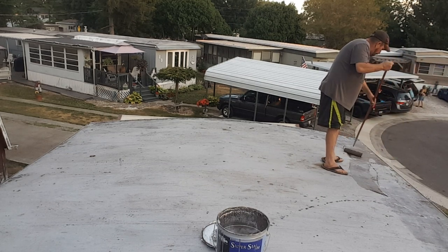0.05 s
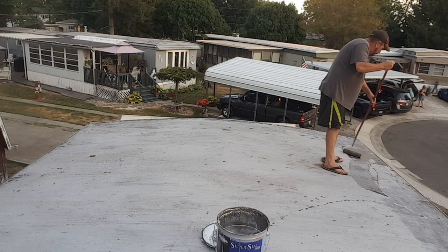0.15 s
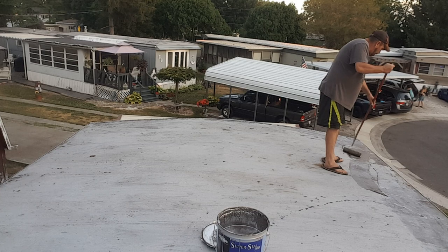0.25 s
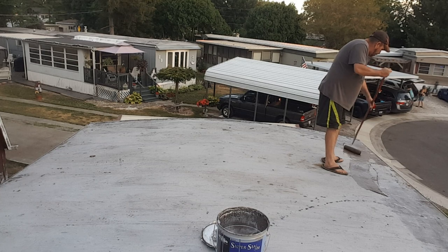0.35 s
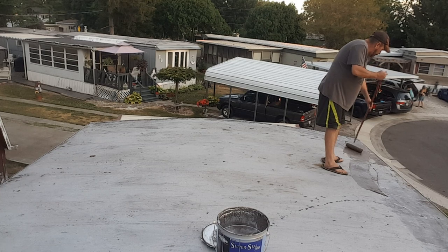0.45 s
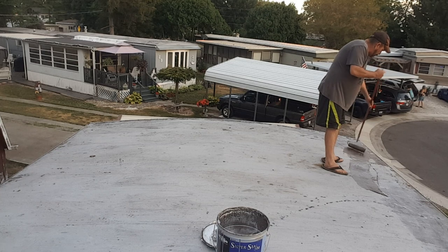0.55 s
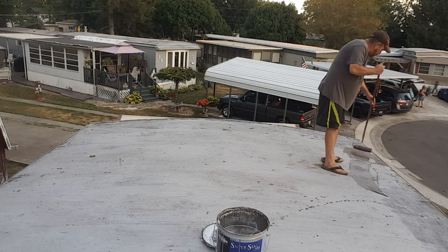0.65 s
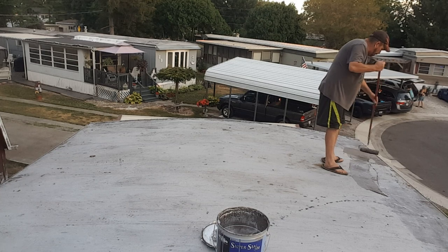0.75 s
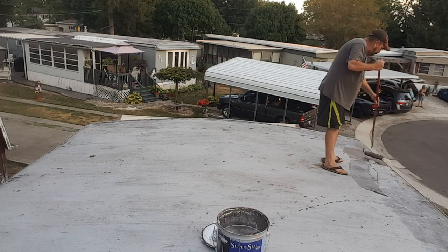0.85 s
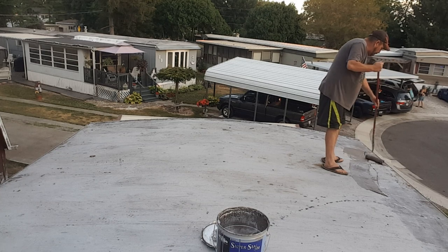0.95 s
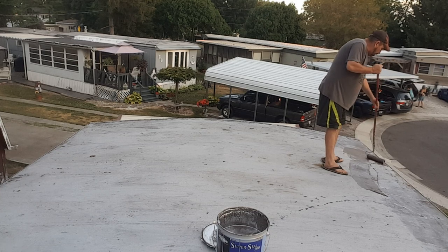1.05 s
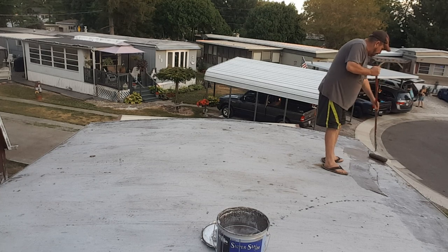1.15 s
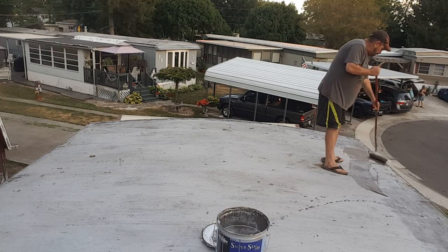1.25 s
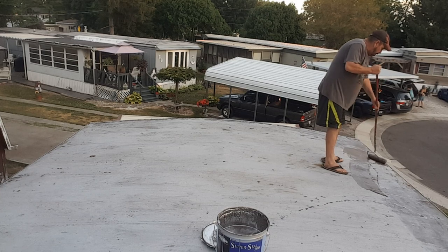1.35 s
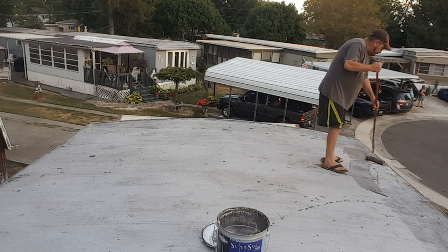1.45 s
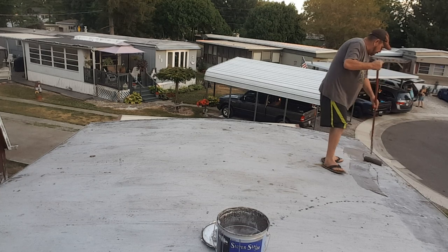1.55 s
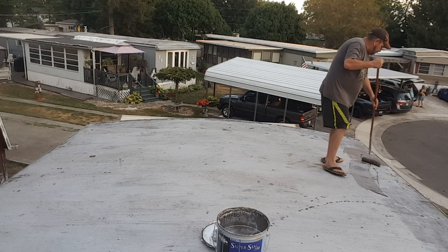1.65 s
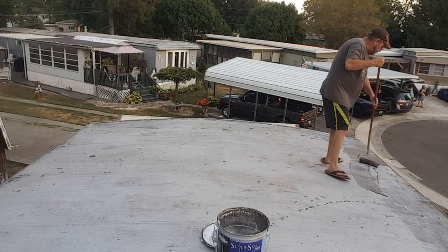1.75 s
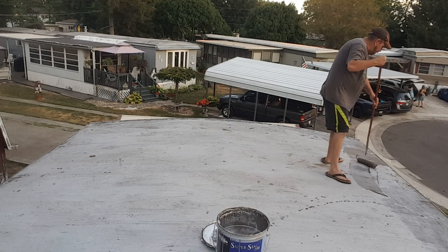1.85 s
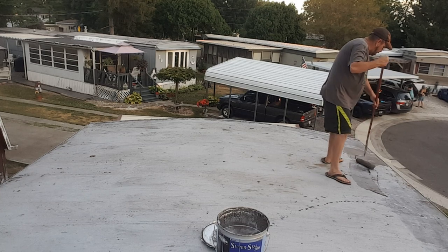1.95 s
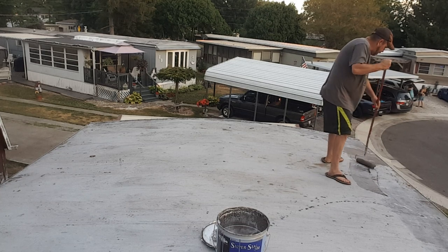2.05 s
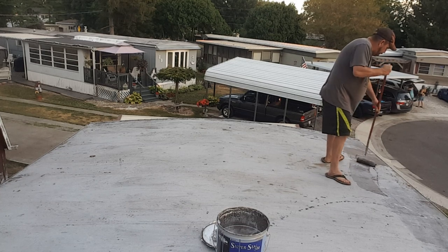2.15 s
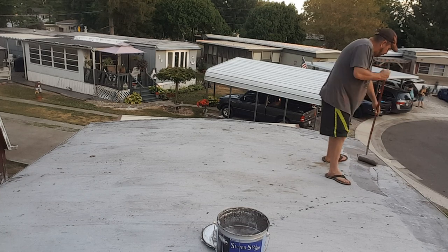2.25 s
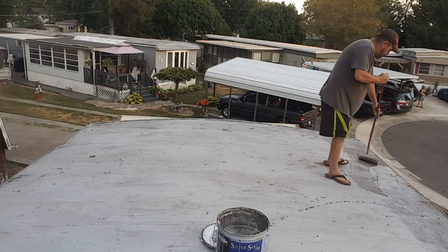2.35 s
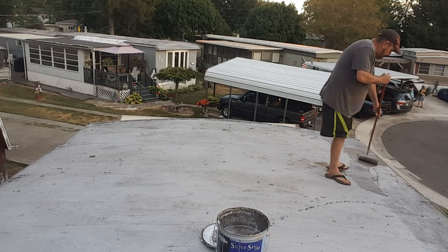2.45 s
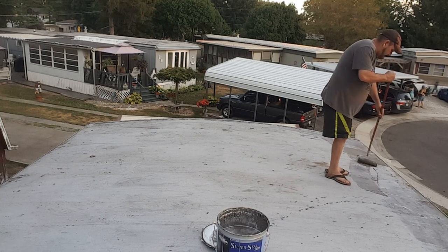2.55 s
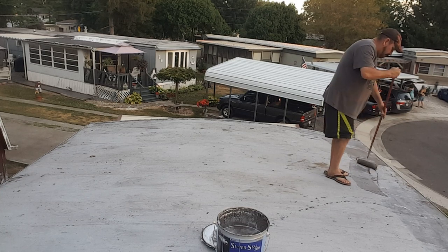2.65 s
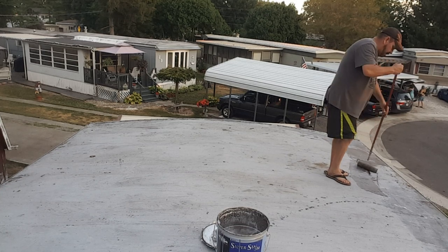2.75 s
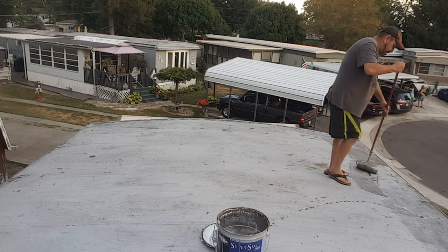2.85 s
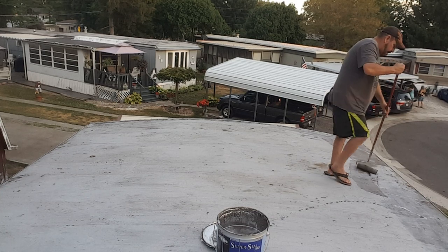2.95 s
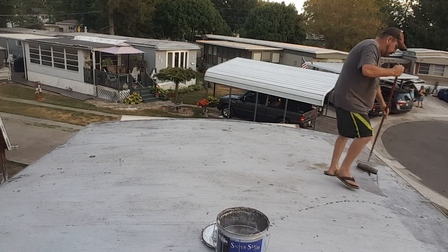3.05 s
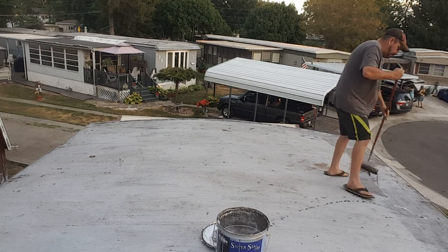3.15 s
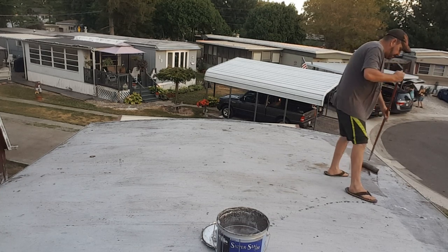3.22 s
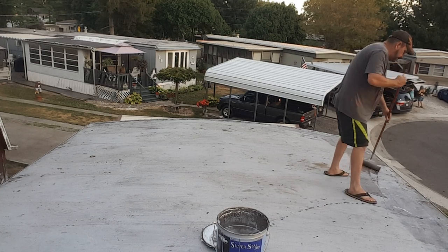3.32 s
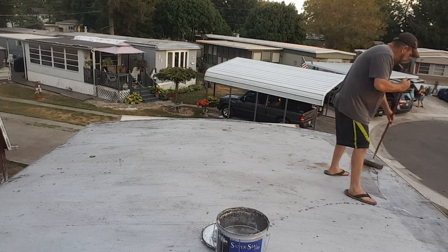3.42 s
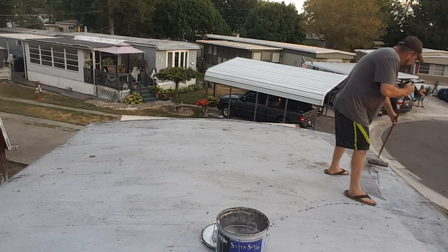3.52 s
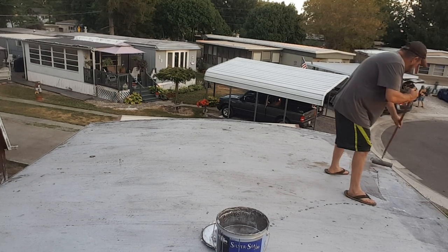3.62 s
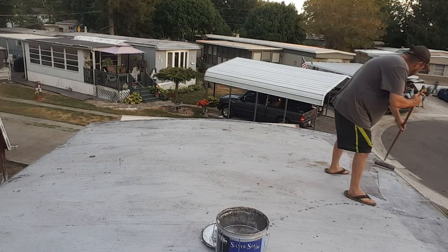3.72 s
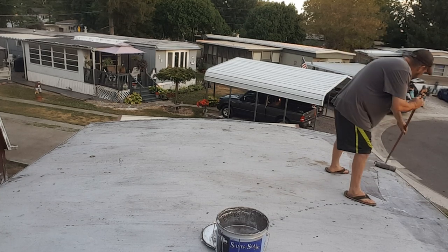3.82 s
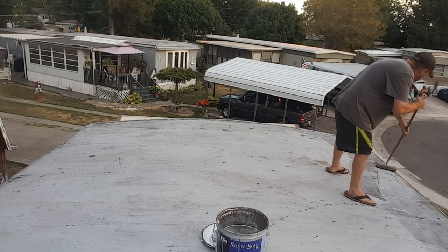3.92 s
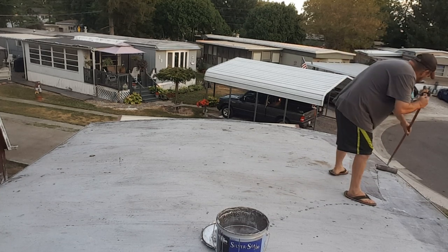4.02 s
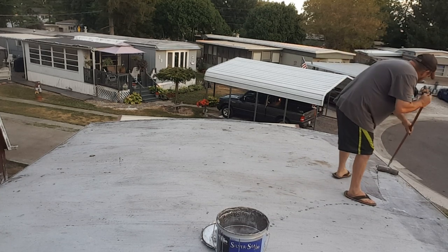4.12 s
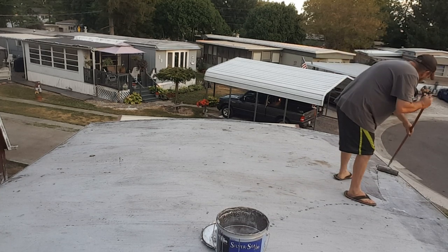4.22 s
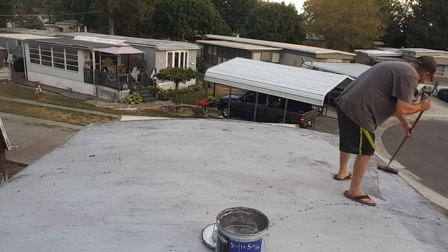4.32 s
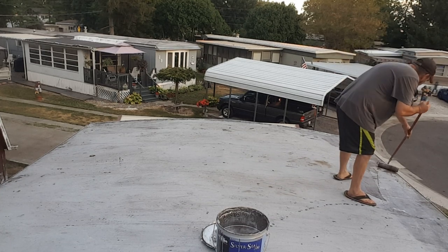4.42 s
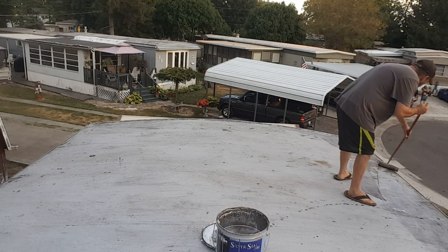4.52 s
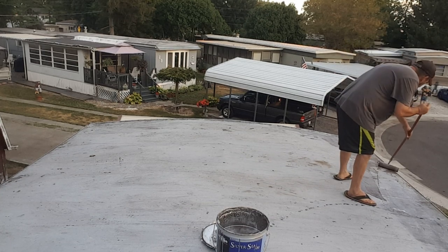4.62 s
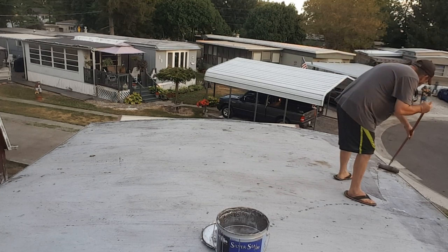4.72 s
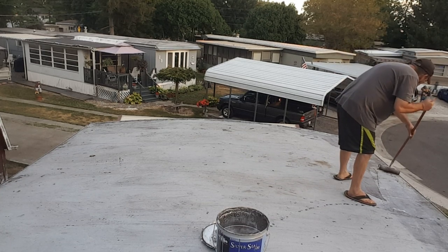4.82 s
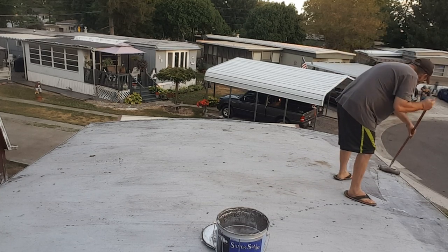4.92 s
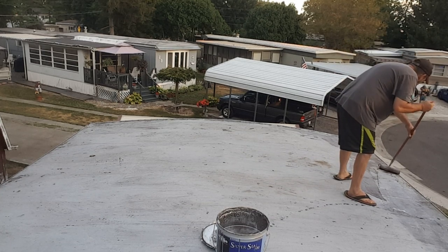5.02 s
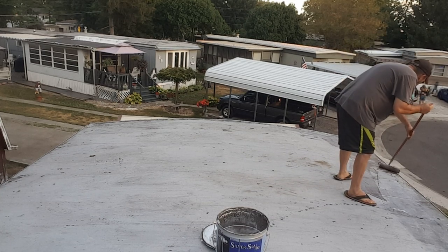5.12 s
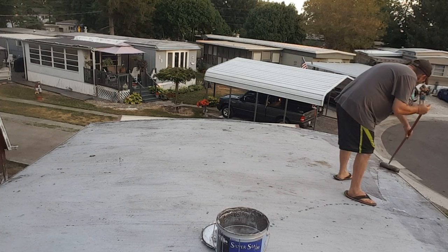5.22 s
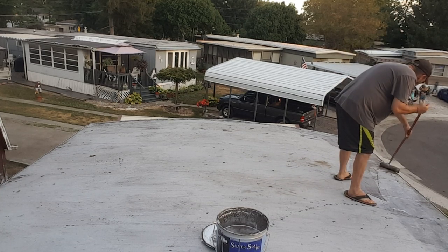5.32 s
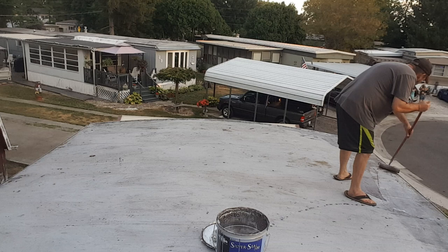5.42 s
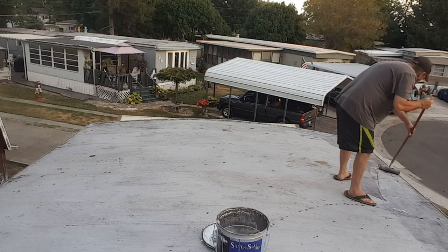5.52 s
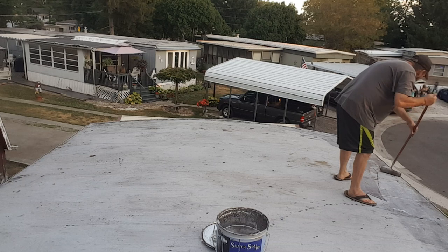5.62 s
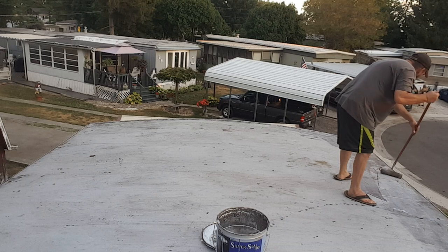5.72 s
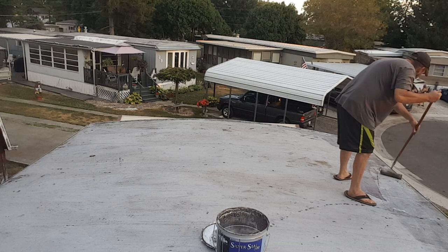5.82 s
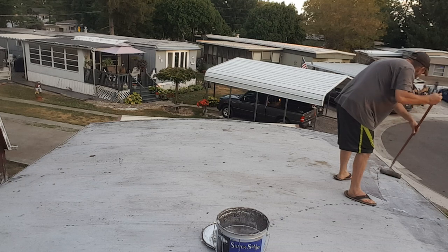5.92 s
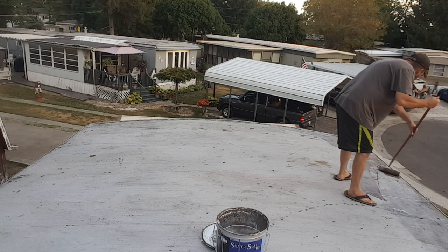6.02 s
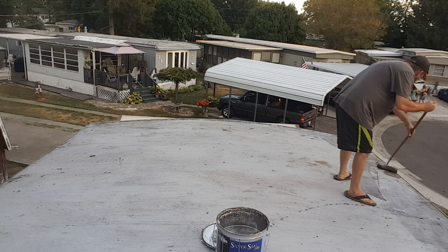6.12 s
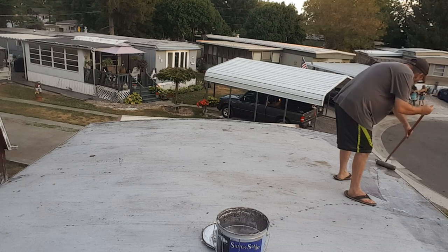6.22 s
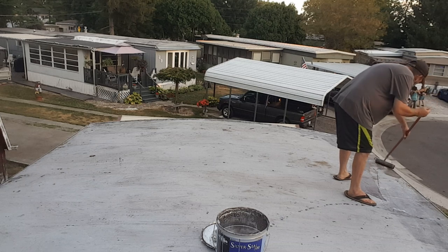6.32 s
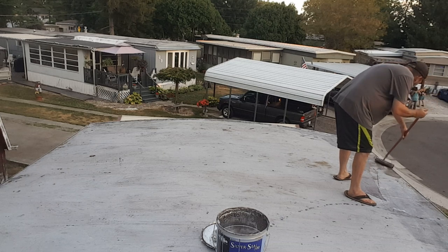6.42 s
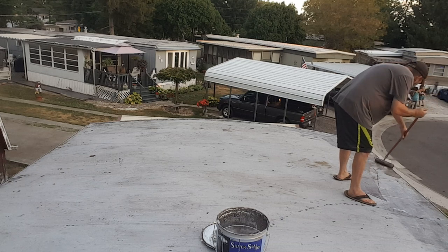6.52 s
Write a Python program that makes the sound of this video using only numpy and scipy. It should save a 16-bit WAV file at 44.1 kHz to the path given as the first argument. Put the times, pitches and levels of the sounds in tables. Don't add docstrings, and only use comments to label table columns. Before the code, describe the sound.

Sandalled feet shift on a coated metal roof, sheet panels popping and booming dully over gritty scuffs, loudest midway, with faint distant traffic rumble.

```python
import sys
import numpy as np
from scipy import signal
from scipy.fft import rfft, irfft, next_fast_len
from scipy.io import wavfile
from scipy.ndimage import uniform_filter1d, map_coordinates

SR = 44100
rng = np.random.default_rng(int(sys.argv[2]) if len(sys.argv) > 2 else 0)


def put_to_file(sound):
    columns = np.atleast_2d(sound).T
    safe = np.clip(columns, -1, 1)
    whole_steps = np.round(safe * 32767)
    wavfile.write(sys.argv[1], SR, whole_steps.astype(np.int16))


def invert_db(x):
    u = np.asarray(x, float) / 20
    return 10 ** u


N = 289737


def unit(x):
    return x / np.sqrt(np.mean(x ** 2) + 1e-20)


def along(points, hz):
    f, v = np.transpose(points)
    return np.interp(np.log(hz + 1), np.log(f + 1), v)


def curve(rows):
    return np.interp(np.arange(N) / SR, *np.transpose(rows))


def wobble(rate, size=32):
    at = np.arange(0, N + size, size)
    knots = rng.standard_normal(int(N * rate / SR) + 4)
    return np.interp(np.arange(N), at, map_coordinates(knots, [at * rate / SR]))


def filtered(x, response):
    m = next_fast_len(N + 8192)
    return irfft(rfft(x, m) * response(np.fft.rfftfreq(m, 1 / SR)), m)[..., :N]


def ports(pair, lag, left):
    side = np.array([[1], [-1]])
    return filtered(pair, lambda hz: np.exp(1j * np.pi * lag * hz * side) * invert_db(along(left, hz) / 2 * side))


def mix_angle(alike, hz):
    return np.arccos(np.clip(along(alike, hz), -1, 1)) / 2


def spread(pair, spectrum, alike):
    def response(hz):
        angle = mix_angle(alike, hz)
        return invert_db(along(spectrum, hz)) * [np.cos(angle), np.sin(angle)]
    mid, side = filtered(pair, response)
    return unit(np.array([mid + side, mid - side]))


def patchy(depth_db):
    z = signal.stft(rng.standard_normal((2, N)), nperseg=512)[2]
    field = rng.standard_normal(z.shape[1:])
    field = uniform_filter1d(uniform_filter1d(field, 5, 0), 12, 1)
    return signal.istft(z * invert_db(depth_db * unit(field)), nperseg=512)[1][:, :N]


# f [Hz], level [dB per Hz]
TRAFFIC_COLOUR = [(12, -55), (20, -24.5), (27, -10), (101, 1), (162, -10), (239, -6), (260, -18.5),
                  (298, -3.5), (363, -16), (405, -9), (884, -10), (961, -14), (1590, -19), (1930, -18.5),
                  (15600, -46)]
# f [Hz], left-right likeness [0-1]
TRAFFIC_ALIKE = [(100, 0.93), (500, 0.54), (1500, 0.47), (4000, 0.27), (10000, 0.087)]
# f [Hz], level [dB rms]
FAN_LINES = [(102.3, -63.5), (199.2, -64.5), (296.1, -78), (403.7, -72), (732.1, -77.5), (931.3, -73.5),
             (990.5, -66), (1109, -73), (1884, -69.5), (2099, -73), (2912, -85.5), (9674, -100.5)]
# f [Hz], level [dB rms]
MOTOR_WHINE = [(6643, -99), (6702, -103), (6761, -97), (6993, -94), (7983, -99), (9615, -99), (9674, -100),
               (9733, -99)]
# f [Hz], left louder by [dB]
FAR_LEFT_DB = [(100, -0.5), (1000, 2), (10000, -1.3)]
TRAFFIC_DB, FAR_LAG = -51.5, -13 / SR


def town():
    drift = invert_db(TRAFFIC_DB - 1.5 + 0.8 * wobble(1.404))
    traffic = drift * spread(patchy(0.86), TRAFFIC_COLOUR, TRAFFIC_ALIKE)
    t = np.arange(N) / SR
    fan = np.zeros(N)
    for hz, db in FAN_LINES + MOTOR_WHINE:
        level = invert_db(db + 5 + 1.2 * wobble(7.9))
        fan += level * np.sin(2 * np.pi * hz * t + 1.2 * wobble(8))
    return ports(traffic + fan, FAR_LAG, FAR_LEFT_DB)


# t [s], level [dB]
FLEX_LEVEL = [(0.0, -54), (0.88, -65.5), (1.04, -46.5), (1.42, -56.5), (1.57, -46.5), (1.74, -53),
              (2.18, -49.5), (2.51, -54), (2.7, -48), (3.33, -46), (3.48, -30.5), (3.66, -32.5),
              (3.79, -40.5), (3.88, -26.5), (4.13, -52.5), (5.03, -52.5), (6.29, -57.5), (6.5, -45)]
# f [Hz], level [dB per Hz]
GROAN_COLOUR = [(18, -65), (30, -31.5), (70, 0), (149, -2), (299, -7.5), (647, -21.5), (710, -23),
                (1200, -30), (1560, -73), (2640, -120)]
# f [Hz], left-right likeness [0-1]
SHEET_ALIKE = [(100, 1), (500, 0.96), (1000, 0.8), (2000, 0.41), (4000, 0.3)]


def groan():
    lumps = invert_db(1.8 * wobble(9) + 2.2 * wobble(30))
    return invert_db(curve(FLEX_LEVEL) + 0.5) * unit(lumps * spread(patchy(3.5), GROAN_COLOUR, SHEET_ALIKE))


# start t [s], rise [s], hold [s], level [dB], body level over fizz [dB]
GRIT_STROKES = [(-.1, .1, 0.14, -70.5, .6), (.05, .25, .27, -72, -10), (.7, 0.54, 2.6, -77.5, 5.5),
                (1.447, .1, .05, -70.5, 6), (1.588, 0.031, 0.0089, -58.5, 4),
                (1.764, 0.014, .03, -53, -2.1), (1.79, 0.019, 0.057, -56, 1), (2.2, .13, .03, -67, 3),
                (2.55, .04, .02, -67.5, -3), (2.962, 0.06, .015, -63.5, 3), (3.22, .02, 0.016, -65.5, 12),
                (3.46, .04, .03, -63, -2), (3.79, 0.026, .015, -67, 5), (3.93, .07, .255, -61, 4.5),
                (3.998, .17, .08, -66.5, 9.5), (4.29, .04, .03, -73, 7), (3.6, 1.1, 1.6, -78, 0.5),
                (6.1, 0.069, .05, -72, -7)]
RISE_DB, LIFT_DB_PER_S = 20, 748
AIR_DB, AIR_PER_DB = -8.5, -0.37


def strokes():
    start, rise, hold, db, body_db = np.transpose(GRIT_STROKES)[:, :, None]
    t = np.arange(0, N + 64, 64) / SR
    swell_db = RISE_DB * np.clip((start + rise - t) / rise, 0, 4)
    lift_db = LIFT_DB_PER_S * np.clip(t - start - rise - hold, 0, 1)
    fizz_db = db - swell_db - lift_db
    air_db = fizz_db + AIR_DB + AIR_PER_DB * (db + 63.5)
    layers = [fizz_db, air_db, fizz_db + body_db]
    return [curve(np.c_[t, np.sqrt(np.sum(invert_db(layer) ** 2, axis=0))]) for layer in layers]


# t [s], peak level [dB], f [Hz]
GRIT_SNAPS = [(0.5132, -57, 7700), (1.5164, -53, 7000), (2.5844, -59, 6750), (3.242, -49, 5900),
              (3.2544, -63, 5850), (3.3079, -45, 8700), (3.358, -43.5, 8590), (3.7394, -61, 6760),
              (3.8184, -42.5, 5420), (3.8584, -42.5, 8600), (4.7316, -52.5, 6800), (5.5894, -53.5, 5220),
              (5.9244, -50, 7110)]


def snaps():
    out, t = np.zeros(N + SR), np.arange(300) / SR
    onset = 1 - np.exp(-t / .0004)
    for s, db, hz in GRIT_SNAPS:
        rough = 0.79 + 1.5 * uniform_filter1d(rng.standard_normal(len(t)), size=9)
        ping = invert_db(db - 60 * t / 0.0084) * np.sin(2 * np.pi * hz * t)
        out[round(s * SR):][:len(t)] += ping * rough * onset
    return out[:N]


# f [Hz], level [dB per Hz]
GRIT_COLOUR = [(590, -38), (1000, -15), (1120, -6), (1660, -4.5), (1970, -6), (2260, -6), (2980, -12),
               (4160, -15), (7300, -13), (8380, -5.5), (10100, -19.5), (14400, -14), (15600, -33.5)]
# f [Hz], left louder by [dB]
NEAR_LEFT_DB = [(100, .5), (500, 0.5), (1500, 3.5), (5000, 1.2)]
NEAR_LAG = 7 / SR


def scuffs():
    fizz_gain, air_gain, body_gain = strokes()
    grains = rng.standard_normal((2, N)) * invert_db(3.6 * np.minimum(rng.exponential(1, N), 4))
    grit = spread(grains, GRIT_COLOUR, [(1500, 0.38), (8000, 0.41)])
    body = filtered(grit, lambda hz: 1 / (1 + (hz / 4200) ** 6))
    air = filtered(grit, lambda hz: 1 - 1 / (1 + (hz / 10000) ** 12))
    fizz = grit - body - air
    tone = fizz_gain * unit(fizz) + air_gain * unit(air) + body_gain * unit(body)
    rub = invert_db(-2.5 + 0.9 * wobble(40) + 1.8 * wobble(18)) * tone
    return ports(rub + snaps(), NEAR_LAG, NEAR_LEFT_DB)


EDGE_DB = -1
# t [s], peak level [dB]
CREAK_TIMES = [(0.123, -58), (1.259, -49), (1.656, -46), (2.801, -44), (2.864, -51), (3.13, -59),
               (3.189, -53), (3.239, -51), (4.119, -41), (5.191, -50), (6.017, -46), (6.53, -46)]
# boom [dB], snap [dB], decay factor
CREAK_TONE = (-7, -22.5, 0.71)


def creaks():
    return [(s, db, *CREAK_TONE, EDGE_DB) for s, db in CREAK_TIMES]


# t [s], peak level [dB], decay factor
THUD_TIMES = [(.17, -47, 1.01), (1.499, -43, 1.1), (1.551, -50.5, 1.6), (1.573, -43, 1.7), (1.616, -40, .9),
              (1.945, -37, 1.37), (2.357, -57, 1.01), (2.399, -54, 0.87), (2.59, -42, 0.54),
              (2.926, -46, 0.51), (2.965, -44.5, 0.64), (3.284, -45, 0.93), (3.308, -39.5, 1.1),
              (4.034, -41.5, 0.55), (4.172, -49.5, .9), (4.291, -36.5, 0.32), (4.369, -57, .8),
              (6.398, -47, 1.4)]
# boom [dB], snap [dB]
THUD_TONE = (8, -26.5)


def thuds():
    return [(s, db, *THUD_TONE, decay, EDGE_DB) for s, db, decay in THUD_TIMES]


# t [s], peak level [dB], boom [dB], snap [dB], edge [dB]
SEAM_RIPPLES = [(2.232, -27, -4, -23, -7), (2.255, -22.5, -9.5, -15, -7), (2.284, -23.5, -4, -41, -2.1),
                (2.314, -30, -5, -38, -2.1), (2.59, -42.5, -5, -8.5, 3), (2.674, -28.5, -3.5, -16, -6),
                (2.69, -33, -5, -22, -3), (3.479, -18, -6, -3, 3), (3.494, -9.5, -4.5, -12, 2.5),
                (3.509, -7.5, -21.5, -11.5, 1.3), (3.524, -12.5, -24.5, -13.5, -2),
                (3.554, -21.5, -7.5, -5.5, -1), (3.584, -21.5, -6.5, -10.5, -1.5),
                (3.728, -24, -6, -27.5, 8.5), (3.814, -31, -5.5, -19, -3), (3.829, -18, -3, -18, 3),
                (3.843, -12.5, -10.5, -12.5, -1), (3.861, -15, -8.5, -13, -13), (3.884, -17, -9.5, -15, -8),
                (4.874, -23.5, -6, -9, -10.5), (6.192, -37.5, -8, -28, -2.1)]
RIPPLE_DECAY, LOOSER_PER_DB = 1.074, 0.06


def ripples():
    return [(s, db, boom, snap, RIPPLE_DECAY - LOOSER_PER_DB * (db + 12), edge)
            for s, db, boom, snap, edge in SEAM_RIPPLES]


# t [s], peak level [dB], boom [dB], snap [dB], decay factor
SINGLE_BUCKLES = [(1.013, -23.5, -5.5, -13, 0.86), (1.403, -23.5, -4.5, -4, 0.58),
                  (1.957, -28, -10, -22, 1.75), (2.095, -32, -11, -20, 1.45), (2.709, -29, 2, -33, 0.85),
                  (3.017, -34.5, -7.5, -23, 1.3), (3.326, -13, -5.5, -16.5, 1.31),
                  (3.394, -21, -6.5, -17, 1.7), (3.622, -10.5, -13, -9.5, 1.27),
                  (3.744, -28.5, -28, -21, 2.3), (3.904, -25, -14, -20, 2.1), (4.886, -24, -7, -28, 0.75),
                  (6.463, -29.5, -10, -27, 1.44)]
# t after the buckle [s], level relative to it [dB]
SETTLING = [
    (.021, -13),
    (.056, -21.5),
    (.09, -30.5),
]
SETTLE_BOOM_DB, SETTLE_SNAP_DB, SETTLE_EDGE_DB = 4.5, -0.5, -1.5
SETTLE_DECAY, SETTLE_SCATTER = 1.14, .15


def buckles():
    rows = [(*row, EDGE_DB) for row in SINGLE_BUCKLES]
    for s, db, boom, snap, _ in SINGLE_BUCKLES:
        for later, under in SETTLING:
            share = 1 + SETTLE_SCATTER * rng.uniform(-0.994, 1)
            rows.append((s + later * share, db + under, boom + SETTLE_BOOM_DB, snap + SETTLE_SNAP_DB,
                         SETTLE_DECAY, SETTLE_EDGE_DB))
    return rows


# f [Hz], level [dB per Hz]
POP_COLOUR = [(24, -51), (40, 1), (146, 6), (262, -1.5), (315, -2.5), (360, -6), (607, -5.5), (1140, -13),
              (1720, -19), (2830, -34), (9000, -71), (11700, -99), (19800, -120)]
# f [Hz], t60 [s]
RING_TIME = [(60, 0.27), (160, 0.17), (420, 0.16), (1100, 0.096), (3000, 0.13), (8000, 0.021)]


def panels(count=400):
    place = (np.arange(count) + rng.uniform(0, 1, count)) / count
    hz = 50 + 8000 * place ** 2
    colour = invert_db(along(POP_COLOUR, hz)) * np.sqrt(place)
    t = np.arange(SR // 4) / SR
    root = np.sqrt(hz)[:, None]
    arrival = 1 - np.exp(-(t * root / 0.046) ** 2)
    fall = invert_db(-60 * t / along(RING_TIME, hz)[:, None])
    fall = fall + invert_db(-16.5) * fall ** 0.41
    modes = arrival * fall * np.cos(2 * np.pi * hz[:, None] * t - 0.899 * root)

    s, db, boom_db, snap_db, decay, edge_db = np.transpose(buckles() + ripples() + thuds() + creaks())
    angle = mix_angle(SHEET_ALIKE, hz)
    a, b = np.moveaxis(rng.standard_normal((len(s), 2, count)), 1, 0)
    common, apart = (a + 0.19) * np.cos(angle), b * np.sin(angle)
    tilt_db = []
    for low, high, edge in zip(boom_db, snap_db + 14.5, edge_db):
        tilt = [(55, low - 12), (130, low + 3), (480, 0), (1700, high), (4500, 1.3 * high + 2 * edge)]
        tilt_db.append(along(tilt, hz))
    strength = invert_db(db[:, None] - 11 + np.array(tilt_db)) * colour
    rings = strength * [common + apart, common - apart] @ modes

    onset = 1 - np.exp(-(t / .0027) ** 2)
    hold = invert_db(-60 * t / 0.2 * (1 / np.clip(decay, .3, 2)[:, None] - 1))
    fade = np.cos(np.pi / 2 * t / t[-1]) ** .5
    rings = rings * onset * hold * fade
    chatter_db = np.pad(1.7 * wobble(70), (0, SR))
    out = np.zeros((2, N + SR))
    for k, start in enumerate(np.round(s * SR).astype(int)):
        span = slice(start, start + len(t))
        out[:, span] += rings[:, k] * invert_db(chatter_db[span] * np.minimum(t / .02, 1))
    return ports(out[:, :N], NEAR_LAG, NEAR_LEFT_DB)


def scene():
    return town() + groan() + scuffs() + panels()


def band_limit(x):
    return signal.sosfilt(signal.butter(12, 15740, fs=SR, output="sos"), x)


def record(dry):
    cut = filtered(dry, lambda hz: (1j * hz / (40 + 1j * hz)) ** 2)
    hiss = invert_db(-78) * spread(rng.standard_normal((2, N)), [(3000, -8), (16000, 7.0)], [(3000, 0.27)])
    mix = filtered(cut + hiss, lambda hz: hz < 15740)
    return band_limit(mix)


dry = scene()
out = record(dry)
put_to_file(out)
```